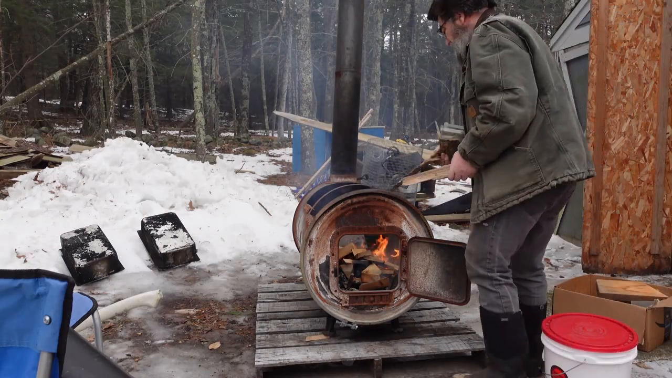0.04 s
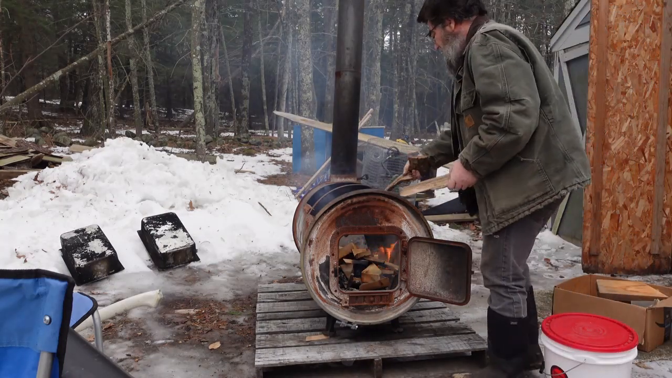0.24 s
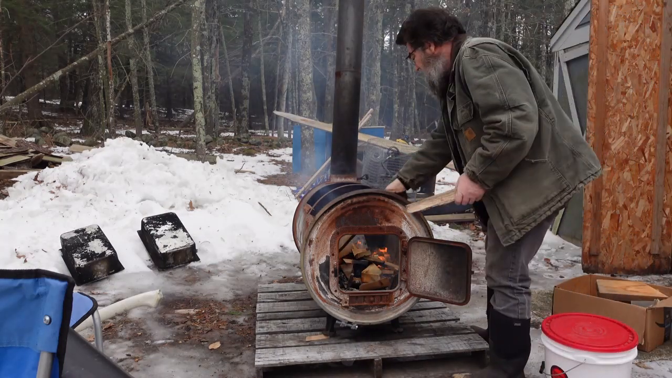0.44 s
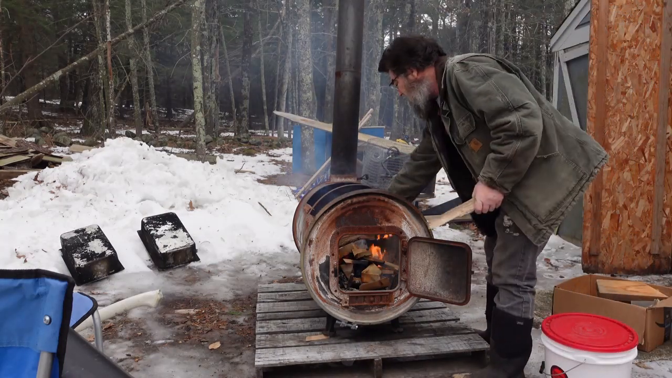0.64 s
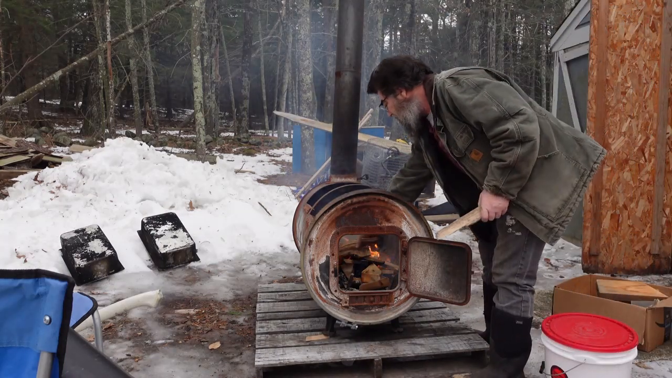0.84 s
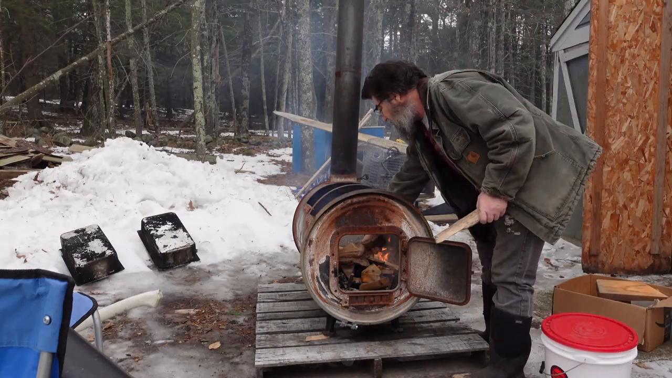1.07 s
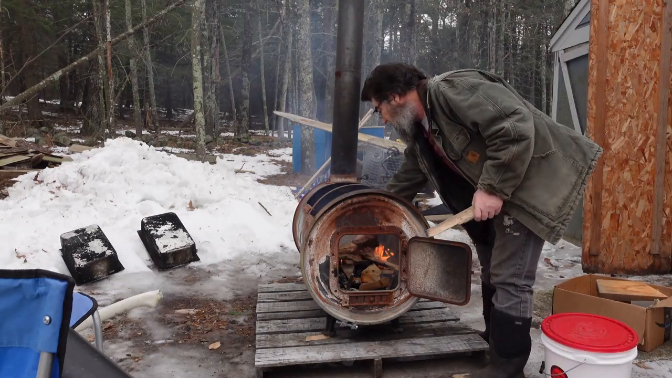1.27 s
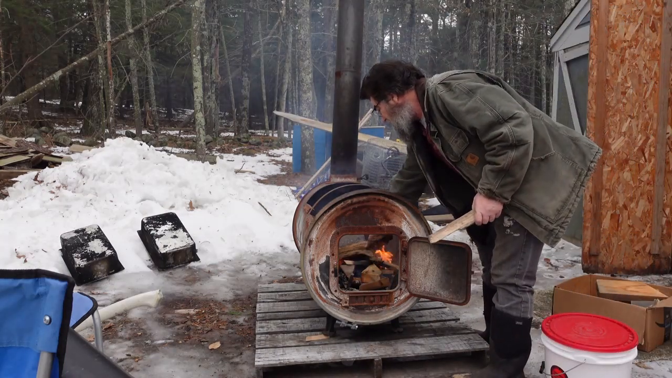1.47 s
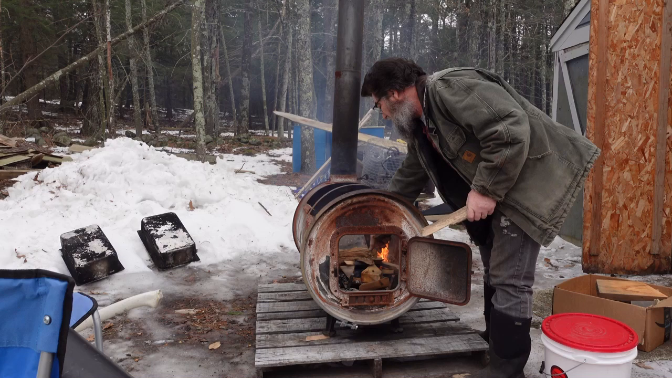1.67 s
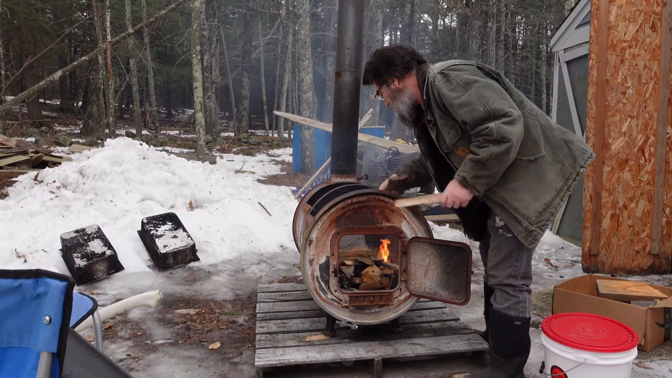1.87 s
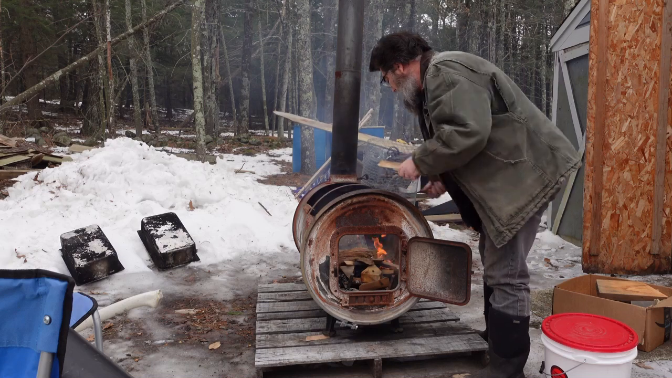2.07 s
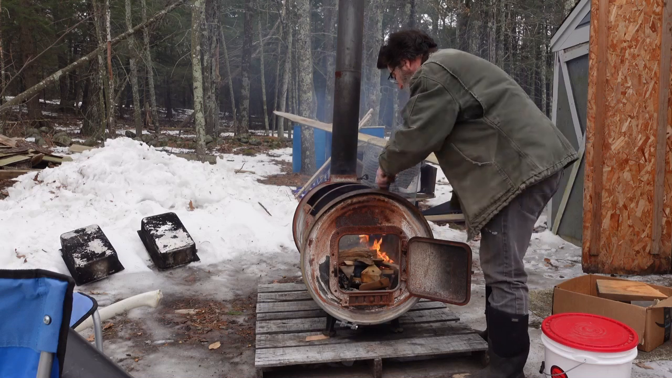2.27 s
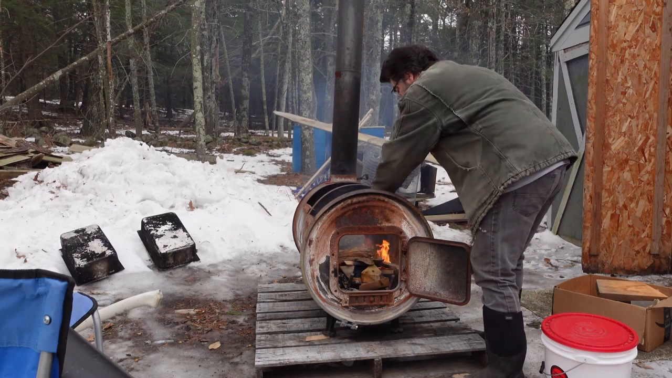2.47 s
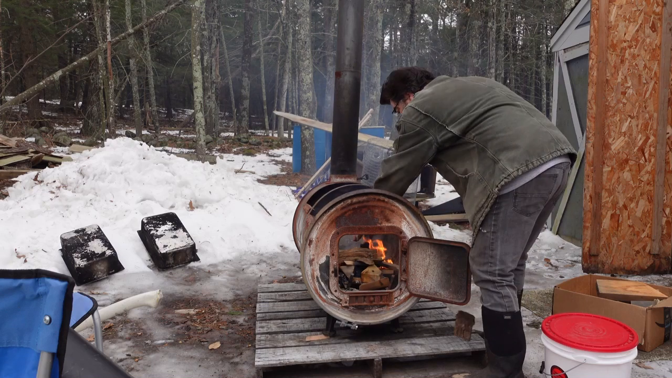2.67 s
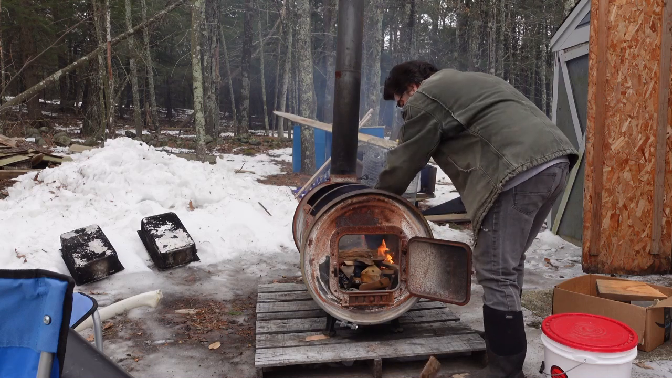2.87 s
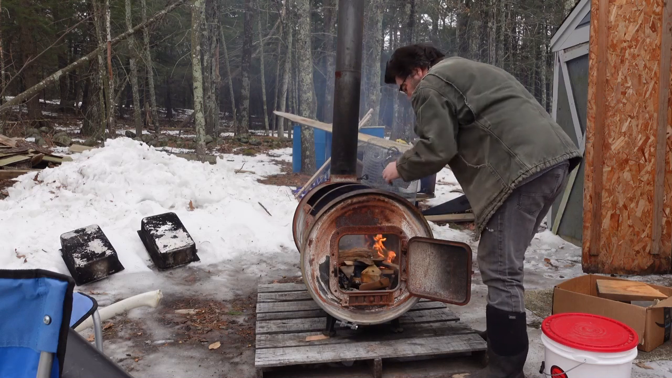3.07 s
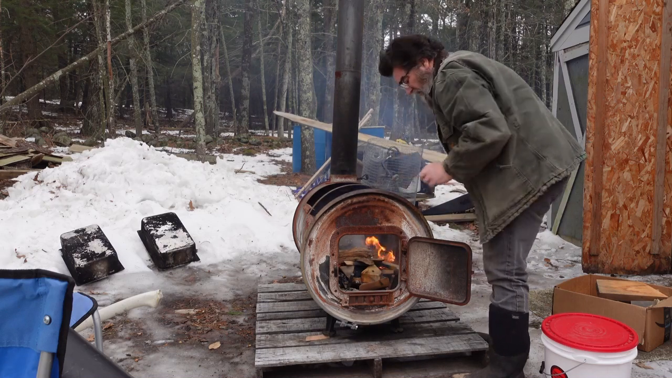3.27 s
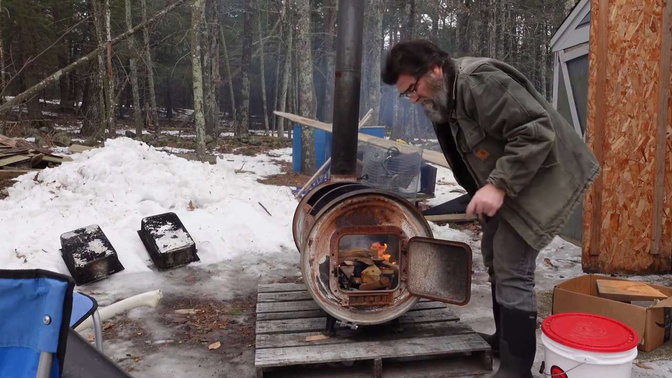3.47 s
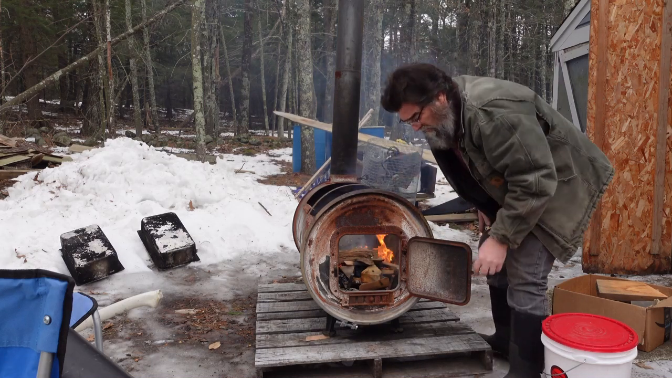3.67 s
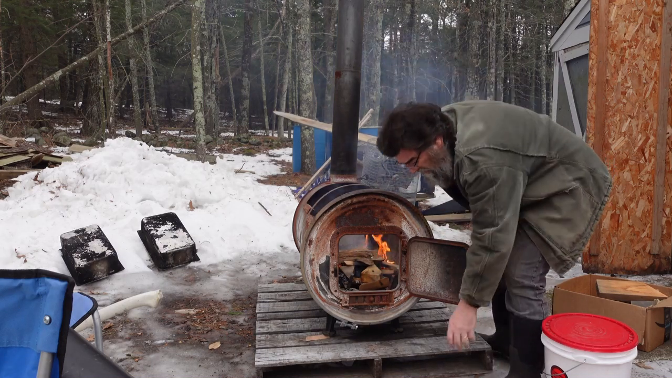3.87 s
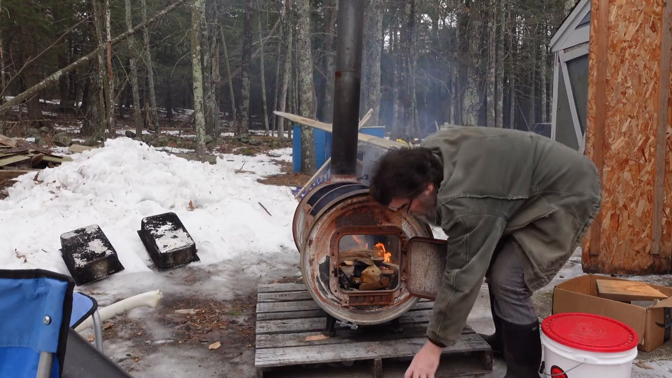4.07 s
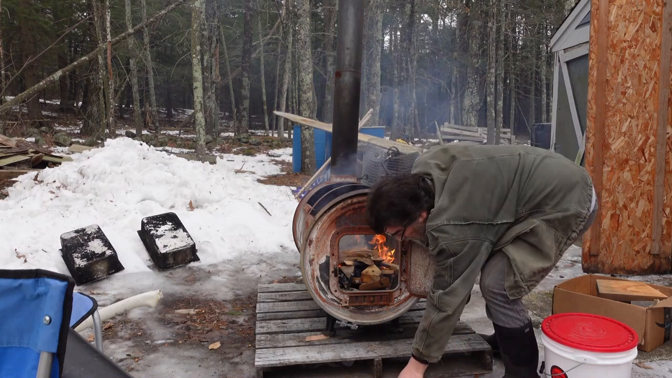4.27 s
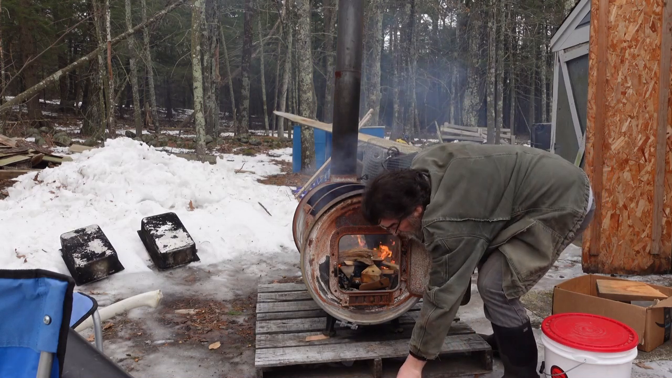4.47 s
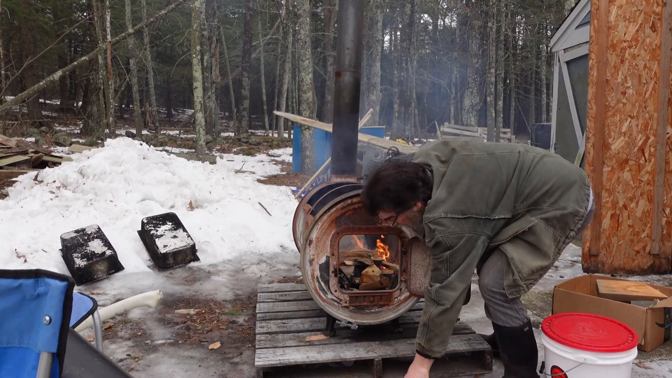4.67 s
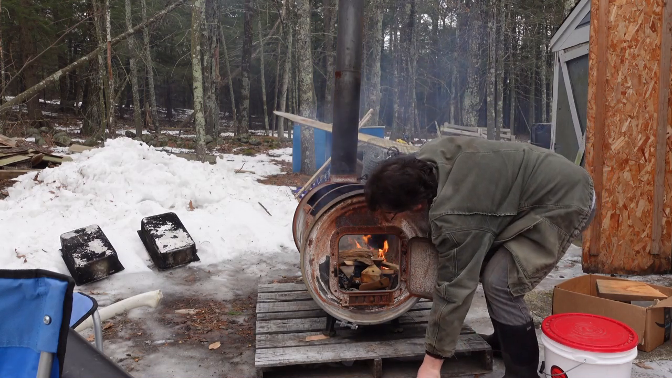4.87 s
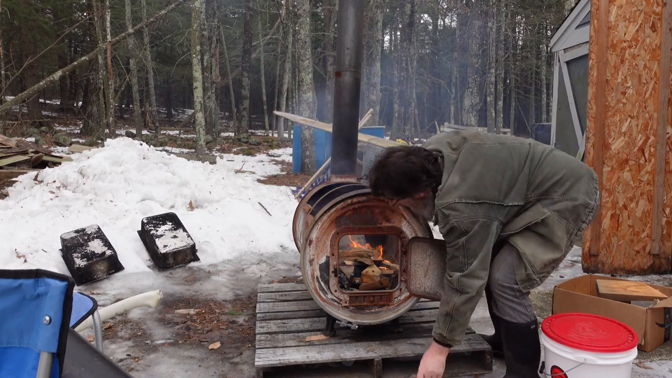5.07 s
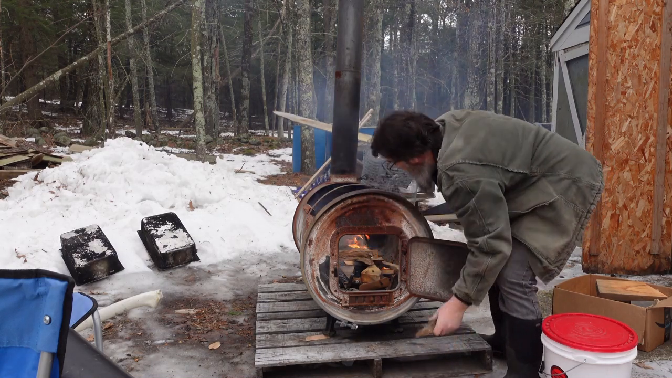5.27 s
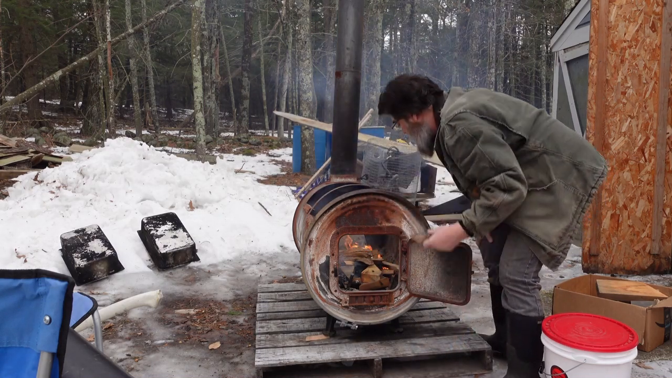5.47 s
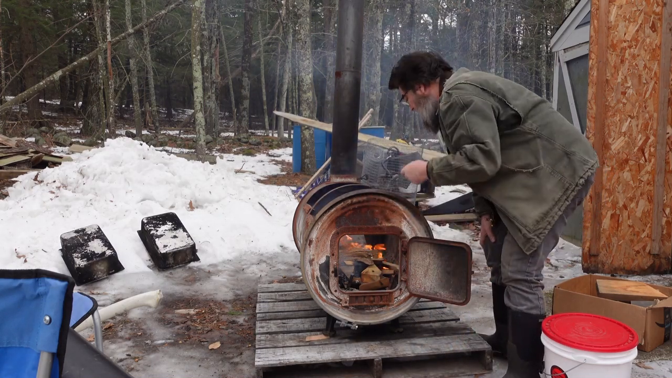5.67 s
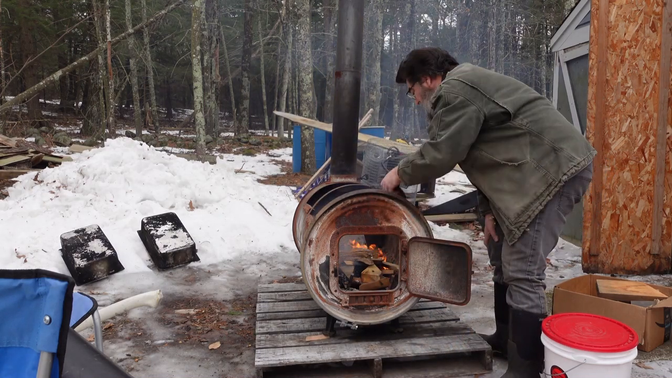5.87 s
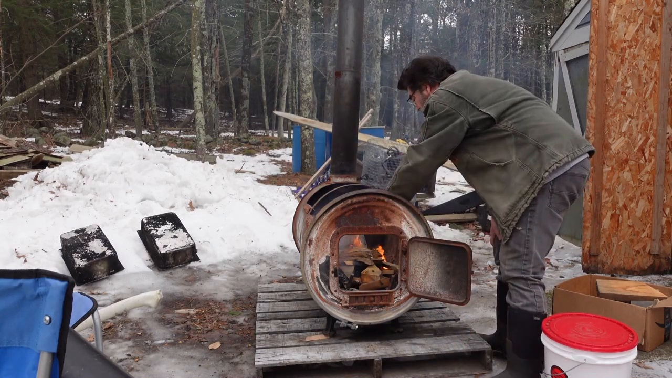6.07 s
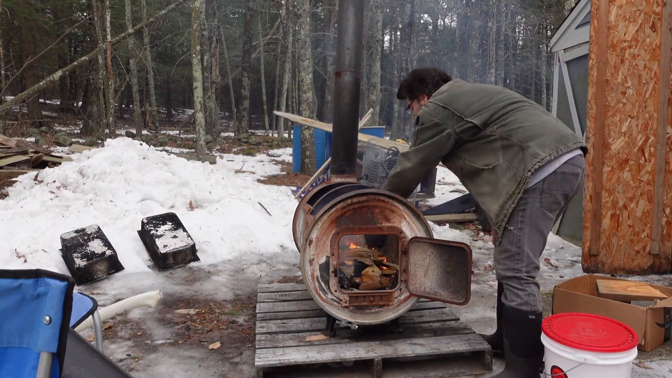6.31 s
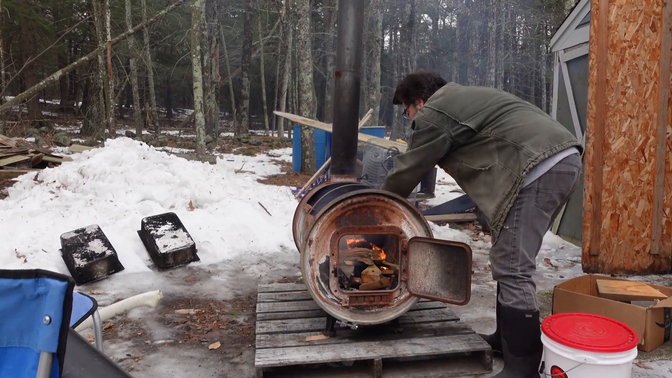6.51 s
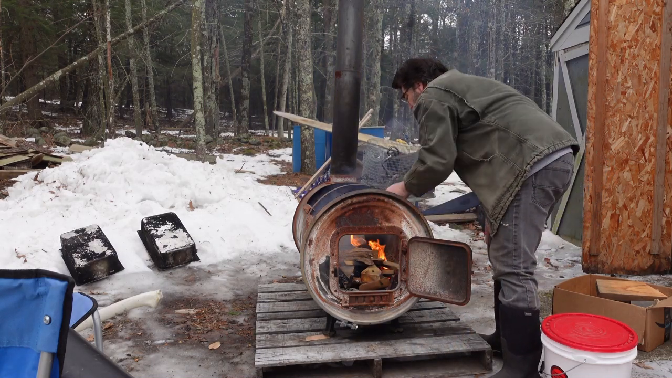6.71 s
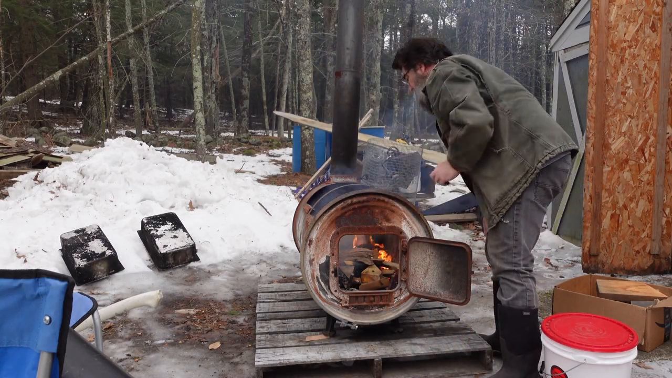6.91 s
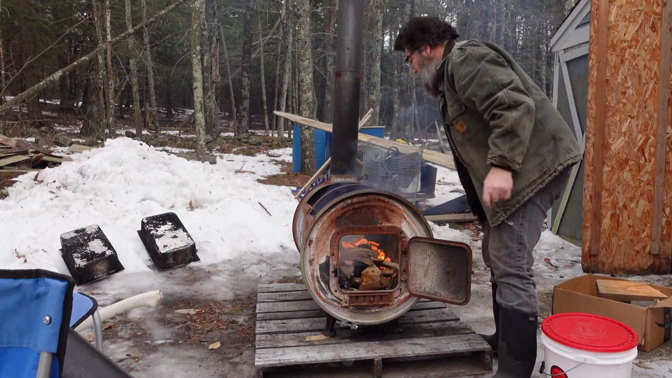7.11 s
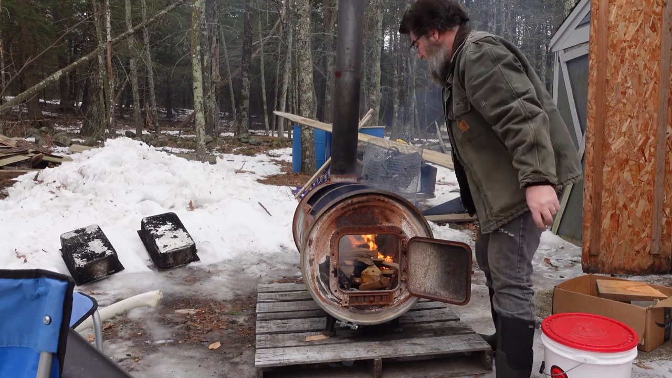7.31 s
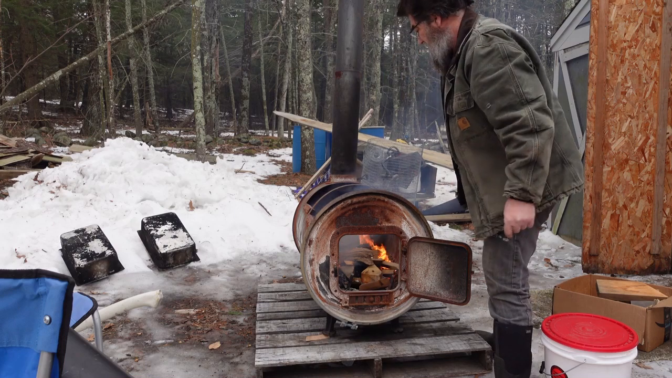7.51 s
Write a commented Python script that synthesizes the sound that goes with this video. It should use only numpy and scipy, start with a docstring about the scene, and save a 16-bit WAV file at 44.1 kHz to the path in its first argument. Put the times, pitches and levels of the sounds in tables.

```python
"""Loading a steel drum stove

Split firewood goes into a stove in a snowy wood, a few metres away. Sticks knock, scrape and clatter;
each blow on the steel booms in the drum and rings the rim of the opening. A jacket rustles as cloth
rubs on cloth, and a hand rakes crunchy scraps off the icy ground. Underneath are the soft wash of
outdoor air, tiny ticks from the fire and three faint, far-off tones."""
import sys
import numpy as np
from scipy import signal
from scipy.fft import rfft, irfft
from scipy.io import wavfile
from scipy.ndimage import uniform_filter1d, map_coordinates

SR = 44100
rng = np.random.default_rng(int(sys.argv[2]) if len(sys.argv) > 2 else 0)


def digitize_waveform(pressure):
    """Quantize a signal to 16-bit integers and store it at the path in sys.argv[1].

    Rows of a 2-D input are taken as channels; values are limited to [-1, 1].
    """
    field = np.atleast_2d(pressure).T
    bounded = np.clip(field, -1, 1)
    quanta = np.round(bounded * 32767).astype(np.int16)
    wavfile.write(sys.argv[1], SR, quanta)


N = 332822
T = np.arange(SR) / SR  # one second of time, counted from the start of a sound

# tone colour of the outdoor air: f/Hz, level/dB
AIR_COLOUR = [(15, -81), (25, -24), (74, -20), (127, -7.5), (223, -11.5), (677, -1), (1520, 0.5),
              (2160, 0.5), (2610, -4.5), (2910, -6), (5140, -10), (7510, -13), (14800, -19.5), (16000, -28)]
# how alike the air is in both ears: f/Hz, likeness (1 = the same)
EAR_LIKENESS = [(60, 1), (240, 0.55), (950, 0.37), (3770, 0.071), (15000, 0.71)]
# tone colour of a dry crack of wood: f/Hz, level/dB
CRACK_COLOUR = [(100, -66), (600, 5.5), (2000, 12.5), (5000, 9), (8000, 5.5), (12000, -10.5), (16000, -12)]
# tone colour of rubbing canvas: f/Hz, level/dB
CLOTH_COLOUR = [(60, -55), (300, -21), (700, -3), (1300, 3.5), (2800, -1.5), (6000, -5), (10000, -14.5),
                (16000, -26.5)]
# arm movements that rustle the jacket: start/s, length/s, level/dB
ARM_MOVES = [(0.2, 7.3, -59.5), (1.9, 0.77, -59.5), (3.09, 2.1, -52), (4.32, 0.7, -53),
             (5.194, 0.52, -59.5), (6, 0.26, -57.5), (6.51, 0.67, -53), (7.175, 0.3, -62.5),
             (7.455, .12, -56.5)]
# knocks of wood (a ring time is how long a sound takes to fade by 60 dB):
# t/s, ring peak/dB, stick pitch/Hz, ring time/s, crack peak/dB, crack treble limit/Hz
WOOD_KNOCKS = [(0.11, -42, 5500, 0.027, -57, 9000), (.138, -41, 1510, 0.18, -30, 9000),
               (.188, -44, 1450, .03, -33, 14000), (0.26, -34, 1900, 0.12, -44, 4000),
               (.427, -31, 1950, .03, -36.5, 6000), (.492, -18.5, 2200, 0.082, -17.5, 5500),
               (.494, -29, 1170, 0.053, -31, 6000), (0.695, -51, 3400, .02, -35.5, 14000),
               (.755, -22.5, 1186, 0.083, -42, 5000), (0.919, -28.5, 6680, 0.052, -26.5, 9000),
               (1.328, -39, 2230, 0.025, -16, 4200), (1.343, -23.5, 600, .052, -28, 6000),
               (1.372, -28, 7440, 0.034, -28, 15000), (1.623, -37.5, 1600, 0.068, -32, 5000),
               (1.671, -35, 744, 0.033, -41, 8000), (1.771, -37, 5470, 0.027, -45, 12000),
               (2.5873, -9, 1944, 0.088, -16.5, 6500), (2.5877, -1.5, 4980, 0.0072, -22.5, 17000),
               (2.69, -43, 3000, .02, -21.5, 12000), (2.858, -14.5, 1497, 0.092, -12.5, 17000),
               (2.979, -11, 875, 0.048, -28, 4500), (3.033, -21.5, 1114, 0.1, -36, 5000),
               (3.1263, -6, 1740, 0.022, -25.5, 8000), (3.1459, -11.5, 835, 0.019, -26.5, 9000),
               (3.1519, -9, 1070, .035, -31, 6000), (3.1578, -6, 1660, .014, -21, 5000),
               (3.168, -13, 1110, 0.024, -30, 5000), (3.264, -20, 1650, 0.091, -61, 8000),
               (3.468, -27.5, 2490, 0.072, -38, 6000), (4.228, -45, 6120, 0.17, -44, 14000),
               (4.326, -32, 1034, 0.045, -40, 4000), (4.622, -28, 3200, 0.013, -20, 12000),
               (4.678, -38, 9000, 0.033, -51, 15000), (4.701, -40, 7060, 0.074, -56, 15000),
               (4.93, -44, 1680, .018, -40, 8000), (5.032, -49, 610, 0.043, -41.5, 8000),
               (5.437, -44, 2600, .02, -43, 10000), (5.504, -35, 1960, 0.053, -33, 14000),
               (5.943, -40, 5380, 0.056, -48, 16000), (5.999, -38, 2720, 0.021, -37, 9000),
               (6.508, -36, 1240, 0.034, -26, 14000), (6.54, -21.5, 840, 0.049, -27.5, 2200),
               (6.982, -32, 3370, 0.021, -35, 5000), (7.153, -46, 3300, .031, -41.5, 10000),
               (7.23, -32, 800, 0.018, -32, 2500)]
# the notes a split stick rings at: multiple of its pitch, level/dB, share of its ring time
STICK_NOTES = [(0.456, -4.5, 0.87), (0.68, 1, 0.72), (0.999, 8.5, 0.69), (1.172, 4.5, 0.29),
               (1.661, -8.5, 0.54), (2.45, -14, 0.81), (3.1, -20, 0.65)]
# strokes of sliding wood (a narrow width squeaks):
# start/s, length/s, level/dB, pitch/Hz, width/octaves, steel ring compared with the grit/dB
SLIDES = [(0.134, 0.15, -46, 2530, 0.78, -23), (0.257, 0.058, -38, 2160, 0.22, -24.5),
          (0.479, 0.045, -26.5, 1325, 0.028, -36), (0.743, 0.11, -36.5, 5250, 1.2, -2),
          (0.827, 0.22, -38.5, 6440, 1.4, -21), (1.016, 0.35, -38.5, 5500, 0.92, -17),
          (1.27, 0.25, -36.5, 6850, 1.6, -16), (1.415, 0.32, -45.5, 5160, 2.4, -16),
          (1.629, 0.023, -39.5, 2400, 0.19, -23), (1.643, .1, -40, 3660, 1.3, -21),
          (2.801, 0.036, -34.5, 6600, 0.12, -8), (3.223, 0.1, -35, 2520, 0.43, -5.5),
          (3.475, 0.12, -32.5, 2460, 0.29, -25), (3.604, 0.087, -40, 1680, 0.55, -30),
          (3.613, 0.3, -48, 4150, 0.92, -28), (4.365, 0.24, -51, 3280, 0.0072, -33),
          (6.067, 0.075, -52, 3000, 0.45, -25), (6.528, 0.036, -35, 1500, 1.1, -2.5),
          (6.56, 0.087, -51.5, 3200, .012, -22), (6.665, .28, -51, 2480, 0.28, -27),
          (6.748, .075, -46, 1960, .3, -20), (6.923, 0.058, -51, 2310, 0.3, -26),
          (7.205, 0.043, -50, 2430, 0.45, -28), (7.323, 0.05, -54.5, 1990, 0.33, -7)]
# tone colour of rough wood slipping: f/Hz, level/dB
GRIT_COLOUR = [(60, -38), (300, 7), (900, 8), (3000, -1), (7500, -5.5), (11000, -8.5), (16000, -22)]
# pitches that stand out in a rubbed stick: f/Hz, width/Hz, level over the plain grit/dB
RASP_PEAKS = [(1140, 130, -8.5), (1580, 180, -10), (2214, 100, 4.5), (2766, 110, 6.5), (3230, 135, 9),
              (3920, 210, 7), (4750, 210, 6.5), (5630, 190, 9.5), (6320, 145, 5.5), (7030, 150, 7),
              (7460, 160, 4.5), (8720, 82, 5.5)]
# blows on the steel: t/s, shell/dB, boom/dB, rim/dB, hardness/Hz (higher is brighter)
STEEL_BLOWS = [(0.426, -42, -48, -60, 1920), (.493, -45.5, -48.5, -35.5, 2800),
               (.535, -60, -52, -48.5, 5500), (.639, -55, -53.5, -53.5, 3150),
               (.757, -37, -33.5, -45, 1220), (.80, -42.5, -42.5, -44, 1460),
               (.855, -49.5, -44.5, -58, 1410), (0.946, -74, -53.5, -75, 1500),
               (1.329, -32, -33, -61, 1490), (1.341, -35.5, -36, -58, 1070), (1.359, -53, -46, -70, 50),
               (1.421, -61, -67, -43.5, 1800), (1.667, -51, -64, -70, 1190), (2.5876, -21, -49, -30, 5600),
               (2.61, -22.5, -32.5, -34, 3820), (2.763, -40, -59, -30.5, 5900),
               (2.803, -42, -41.5, -42, 1450), (2.859, -50, -54, -31.5, 8000), (2.876, -44, -57, -23, 9700),
               (2.978, -35, -50, -29.5, 3540), (3.091, -60, -45.5, -40, 4460),
               (3.154, -46, -45.5, -36, 1990), (3.205, -40.5, -51, -40.5, 5500),
               (3.26, -41, -66, -42, 3570), (3.313, -44.5, -75, -36, 3900), (6.508, -48, -52, -76, 1500),
               (6.54, -41, -64, -58, 1180), (6.55, -50, -53, -68, 260)]
# the strongest notes of the drum's shell: f/Hz, level/dB, ring time/s
SHELL_NOTES = [(802, -4, 0.33), (870, -19, 0.23), (933, 1, 0.17), (930, -3, 0.14), (1100, 3, 0.24),
               (1450, -1, 0.15), (1513, 13.5, 0.089), (1848, -10, 0.067), (2010, 12, 0.083), (2230, 2, .28),
               (2306, -1.5, 0.58), (2480, 0, 0.51), (2840, -2, 0.26), (3920, -1, 0.14)]
# the shell's countless weaker notes, blurred into noise: f/Hz, level/dB, ring time/s
SHELL_NOISE = [(40, -54, 0.4), (80, -19, 0.4), (140, -9, 0.35), (300, -5.5, 0.84), (530, -5, 0.79),
               (890, 9, 0.3), (2200, 3.5, 0.47), (3350, 5, 0.11), (6300, -12.5, 0.81), (10300, -19.5, 0.9),
               (16400, -33, 0.22)]
# the low notes of the hollow drum: f/Hz, level/dB, ring time/s
BOOM_NOTES = [(85.5, -24, 0.52), (135, -17.5, 0.56), (169.5, -13.5, 0.42), (233.8, -7.5, 0.34),
              (261, -4.5, 0.21), (356.3, 1, 0.18), (400, -1.5, 0.24), (442, 1.5, 0.22), (462.5, 3, 0.26),
              (492, 3, 0.55), (556.5, 6.5, 0.29), (658, -0.5, 0.37)]
# the notes of the steel rim: f/Hz, level/dB, ring time/s
RIM_NOTES = [(361.4, -32, 0.33), (487.3, -15.5, 0.18), (547.3, -16, 0.41), (1190, -12.5, 0.44),
             (1248, -7, 0.73), (1300, -15.5, 0.22), (1502, -12, 0.23), (1985, -5.5, 0.15), (2130, -6, 0.18),
             (2560, 1.5, 0.11), (2590, -1.5, 0.084), (3030, -10, 0.13), (3314, -1, 0.099), (3860, -9, 0.11),
             (4200, 1, 0.047), (4670, -15, 0.16), (4970, -9, 0.1), (5590, -7, 0.12), (5630, -18, 0.055),
             (5700, -20, 0.14), (6940, -31, .12), (7450, -36, .13)]
# thin tones far off: start/s, length/s, level/dB, starting pitch/Hz
FAR_TONES = [(1.778, .33, -49.5, 1425), (3.87, 0.28, -57, 1375), (4.664, 0.39, -64, 1059)]
# loudness of a hand raking the icy ground: t/s, level/dB
RAKE_LEVELS = [(4.47, -67), (4.515, -46.5), (4.55, -37.5), (4.59, -39.5), (4.605, -46), (4.625, -35),
               (4.648, -40.5), (4.67, -55), (4.76, -66)]
# tone colour of breaking ice crumbs: f/Hz, level/dB
ICE_COLOUR = [(60, -55), (450, -31), (900, -0.5), (2100, 0.5), (3600, 0.5), (5000, -3), (7000, -0.5),
              (8800, -4), (10500, -12.5), (13500, -14), (16000, -29)]
# tone colour of the nearby echoes (short waves scatter most): f/Hz, level/dB
ECHO_COLOUR = [(100, -13), (500, -8.5), (1500, -2), (4000, 3.5), (12000, 3.5)]
# balance between the ears: f/Hz, left minus right/dB
BALANCE = [(60, 0), (1000, -1.6), (2200, -0.7), (4500, -2), (8000, -1.5), (13000, 0.5)]


def amp(db):
    """Turns decibels into a number to multiply by."""
    return 10 ** (np.asarray(db) / 20)


def unit_level(x):
    """Scales a sound so its average strength (rms) is 1."""
    return x / np.sqrt(np.mean(x ** 2) + 1e-20)


def look_up(table, hz):
    """Reads between a table's rows, with octaves evenly spaced."""
    f, value = np.transpose(table)
    return np.interp(np.log(hz + 1), np.log(f + 1), value)


def coloured(x, table):
    """Gives a sound the tone colour in a table."""
    return irfft(rfft(x) * amp(look_up(table, np.fft.rfftfreq(x.shape[-1], 1 / SR))), x.shape[-1])


def add(mix, start, sound):
    """Adds a sound to the mix, start seconds in."""
    part = mix[round(start * SR):][:len(sound)]
    part += sound[:len(part)]


def wobble(shape, samples):
    """A random wiggle; smoothing over more samples makes it slower."""
    return unit_level(uniform_filter1d(rng.standard_normal(shape), size=samples))


def grains(count, per_s, spread_db):
    """Tiny clicks of uneven size at random moments."""
    size = amp(spread_db * np.minimum(rng.exponential(1, count), 4)) * rng.standard_normal(count)
    return unit_level(size * (rng.random(count) < per_s / SR))


def swell(start, length, skew):
    """One smooth rise and fall of height 1; a skew under 1 brings the top earlier."""
    progress = np.clip((np.arange(N) / SR - start) / length, 0, 1)
    return np.sin(np.pi * progress ** skew)


def softened(x, corner_hz):
    """Dulls the treble, as a soft blow does, then sets the first 50 ms to strength 1."""
    pole = np.exp(-2 * np.pi * corner_hz / SR)
    x = signal.lfilter([1 - pole], [1, -2 * pole, pole * pole], x)
    return x / np.sqrt(np.mean(x[:SR // 20] ** 2))


def octaves(x):
    """Splits a sound into overlapping octave bands; returns their centres and the bands."""
    centres = SR / 2 ** np.arange(10, 1, -1.) * np.sqrt(2)
    place = np.log2(np.fft.rfftfreq(len(x), 1 / SR) + 1)
    shares = np.array([np.interp(place, np.log2(centres), row) for row in np.eye(len(centres))])
    return centres[:, None], irfft(rfft(x) * shares, len(x))


def air(level_db=-59, drift_db=-2.3):
    """The wash of the woods and the draught of the fire: noise that drifts gently in level."""
    left, other = rfft(rng.standard_normal((2, N)))
    likeness = np.clip(look_up(EAR_LIKENESS, np.fft.rfftfreq(N, 1 / SR)), -1, 1)
    right = likeness * left + np.sqrt(1 - likeness ** 2) * other
    wash = coloured(irfft(np.array([left, right]), N), AIR_COLOUR)
    return amp(level_db + drift_db * wobble(N, samples=6000)) * unit_level(wash)


def embers(level_db=-70, fade_s=0.071):
    """Burning wood gives off small, scattered ticks."""
    tick = coloured(rng.standard_normal(SR), CRACK_COLOUR) * amp(-60 * T / fade_s)
    ticks = signal.oaconvolve(grains(N, per_s=15, spread_db=-0.5), tick)[:N]
    return amp(level_db) * unit_level(ticks)


def jacket(rest_db=-67.5):
    """Canvas rubs on canvas: one swell for each arm movement, and a slight stir at rest."""
    moves = sum((amp(db) * swell(start, length, skew=0.44)) ** 2 for start, length, db in ARM_MOVES)
    speed = np.sqrt(amp(rest_db) ** 2 + moves)
    return speed * unit_level(coloured(grains(N, per_s=9000, spread_db=-0.2), CLOTH_COLOUR))


def knocks(crack_s=0.025, tail_s=0.09, tail_db=-19, low_cut_hz=260):
    """A stick rings briefly under the dry crack of its surface; it is too small to give off bass."""
    out, t = np.zeros(N), T[:SR // 5]
    ratio, db, share = np.transpose(STICK_NOTES)[:, :, None]
    sign = (-1) ** np.arange(len(STICK_NOTES))[:, None]
    snap = amp(-60 * t / crack_s) + amp(tail_db - 60 * t / tail_s)
    for start, peak_db, hz, ring_s, crack_db, bright_hz in WOOD_KNOCKS:
        fade = amp(db - 60 * t / (ring_s * share))
        ring = (sign * fade * np.sin(2 * np.pi * hz * ratio * t)).sum(0)
        treble_cut = signal.butter(2, min(bright_hz, .45 * SR), fs=SR)
        crack = signal.lfilter(*treble_cut, coloured(rng.standard_normal(len(t)), CRACK_COLOUR) * snap)
        add(out, start, amp(peak_db) * ring / abs(ring).max() + amp(crack_db) * crack / abs(crack).max())
    return signal.sosfilt(signal.butter(2, low_cut_hz, "highpass", fs=SR, output="sos"), out)


def rasp(count, per_s, spread_db, shift=0.034, wander_db=4.5, wander_per_s=30, slide=.02):
    """Tiny slips ring the stick's own pitches, which come, go and slide as the touching point moves."""
    grit = coloured(grains(count, per_s, spread_db), GRIT_COLOUR)
    out = grit.copy()
    for hz, width, db in RASP_PEAKS:
        detune, *wander = rng.standard_normal(64)
        steps = amp(db + wander_db * np.array(wander))
        gain = np.interp(T[:count] * wander_per_s, np.arange(len(steps)), steps)
        peak = signal.iirpeak(hz * (1 + shift * detune), hz / width, fs=SR)
        out += gain * signal.lfilter(*peak, grit)
    speed = 1 + slide * unit_level(uniform_filter1d(wobble(count, samples=1500), size=1500))
    return map_coordinates(out, [np.cumsum(speed)], order=3, mode="mirror")  # uneven speed bends pitch


def steel_notes(table, ring_scale, spread_db=4.5, rise_s=0.002, detune=0.0036):
    """Steel rings at its own notes (one row each), a little differently wherever it is touched."""
    hz, db, ring_s = np.transpose(table)[:, :, None]
    strength = amp(db + spread_db * rng.standard_normal(hz.shape))
    phase = 2 * np.pi * rng.random(hz.shape)
    hz = hz * (1 + detune * rng.uniform(-1.23, 1, hz.shape))
    fade = amp(-60 * T / (ring_s * ring_scale))
    return strength * fade * np.cos(2 * np.pi * hz * T + phase) * (1 - np.exp(-T / rise_s))


def scrapes(ends_db=-19, judder_db=1.0, hardest_at=0.27):
    """Rough wood slides, catching and slipping; the slips rasp in the stick and ring the steel."""
    out, count = np.zeros(N), SR // 2
    f = np.fft.rfftfreq(count, 1 / SR) + 1
    for start, length, db, hz, width, steel_db in SLIDES:
        judder = wobble(count, samples=300)
        # 0 where the wood presses hardest, 1 at both ends of the stroke
        slack = np.interp(T[:count] / length, [0, hardest_at, 1], [1, 0, 1])
        force = amp(ends_db * slack ** 1.14 + judder_db * judder) * np.clip(8 * (1 - slack), 0, 1)
        band = 1 / np.sqrt(1 + (np.log2(f / hz) / width) ** 2)
        grit = unit_level(irfft(rfft(rasp(count, per_s=4000, spread_db=-0.5)) * band, count))
        damped = steel_notes(RIM_NOTES + BOOM_NOTES[4:], ring_scale=0.16)  # the stick presses on it
        ring = softened(damped.sum(0), corner_hz=2640)
        rubbing = rng.standard_normal(count) * force
        steel = signal.fftconvolve(rubbing, ring / np.linalg.norm(ring))[:count]
        add(out, start, amp(db) * (grit * force + amp(steel_db) * steel))
    return out


def build_up(hz, cycles):
    """Low bending waves travel slowly round the drum, so the bass arrives after the treble."""
    return 1 - np.exp(-(T * hz / cycles) ** 2)


def rim_clang(ring_scale, buzz_db=-6, buzz_s=0.091, rise_s=0.0021):
    """The rim rings while the stick buzzes briefly against it."""
    buzz = rasp(SR, per_s=3300, spread_db=0.0) * amp(-60 * T / buzz_s)
    ring = steel_notes(RIM_NOTES, ring_scale, spread_db=2.5).sum(0)
    return (unit_level(ring) + amp(buzz_db) * unit_level(buzz)) * (1 - np.exp(-T / rise_s))


def stove(notes_db=-5.0, rebound_hz=5500, pressed_scale=0.73):
    """Each blow sets off the crash of the shell, the boom of the hollow drum and the clang of the rim."""
    out, noise_table = np.zeros(N), np.array(SHELL_NOISE)
    centres, _ = octaves(T)
    crash_s = look_up(noise_table[:, ::2], centres)
    crash_rise = build_up(centres, cycles=1.6)
    boom_rise = build_up(np.array(BOOM_NOTES)[:, :1], cycles=2.1)
    for start, shell_db, boom_db, rim_db, hard_hz in STEEL_BLOWS:
        # a hard blow bounces off; a soft one stays pressed on and shortens the ring
        ring_scale = max(pressed_scale, (hard_hz / rebound_hz) ** 0.32)
        _, bands = octaves(coloured(rng.standard_normal(SR), noise_table[:, :2]))
        crash = (bands * crash_rise * amp(-60 * T / (ring_scale * crash_s))).sum(0)
        notes = steel_notes(SHELL_NOTES, ring_scale).sum(0)
        shell = unit_level(crash) + amp(notes_db) * unit_level(notes)
        boom = (steel_notes(BOOM_NOTES, ring_scale) * boom_rise).sum(0)
        for db, part in (shell_db, shell), (boom_db, boom), (rim_db, rim_clang(ring_scale)):
            add(out, start, amp(db) * softened(part, hard_hz))
    return out


def far_tones(rise_hz_per_s=120, waver=0.0325, flutter_db=3.5, octave_below_db=-13):
    """Each faint, hoarse tone swells and rises slightly, with a weaker one an octave below."""
    out = np.zeros(N)
    jitter, flutter = wobble((2, N), samples=110)
    for start, length, db, pitch_hz in FAR_TONES:
        hz = pitch_hz + rise_hz_per_s * (np.arange(N) / SR - start)
        phase = 2 * np.pi * np.cumsum(hz * (1 + waver * jitter)) / SR
        level = amp(db + flutter_db * flutter) * swell(start, length, skew=0.59)
        out += level * (np.sin(phase) + amp(octave_below_db) * np.sin(phase / 2))
    return out


def ice_crunch(clump_db=1.5):
    """Icy crumbs break in dense clumps under the raking hand."""
    level_db = np.interp(np.arange(N) / SR, *np.transpose(RAKE_LEVELS), left=-np.inf, right=-np.inf)
    clumps = wobble(N, samples=250)
    crumbs = coloured(grains(N, per_s=8500, spread_db=-2.2), ICE_COLOUR)
    return amp(level_db + clump_db * clumps) * unit_level(crumbs)


def echoes(x, near_db=-13, near_s=0.12, trees_db=-25, trees_s=0.81):
    """Sound bounces quickly off a pallet and a shed wall, then faintly and dully off the trees."""
    near, trees = rng.standard_normal((2, SR)) * (rng.random((2, SR)) < .1)
    near = near * amp(-60 * T / near_s) * (T > .001)
    near = amp(near_db) * coloured(near / np.linalg.norm(near), ECHO_COLOUR)[:SR // 4]
    trees = softened(trees * amp(-60 * T / trees_s) * (1 - np.exp(-T / 0.0055)), corner_hz=4000)
    trees = amp(trees_db) * trees / np.linalg.norm(trees)
    return signal.oaconvolve(x, near)[:N] + signal.oaconvolve(x, trees)[:N]


def scene():
    """The sounds and their echoes sit a little right of centre, with the air all around."""
    direct = stove() + knocks() + scrapes() + jacket() + ice_crunch() + embers() + far_tones()
    ears = [coloured(direct + echoes(direct), [(hz, side * db / 2) for hz, db in BALANCE])
            for side in (1, -1)]
    return np.array(ears) + air()


def record(dry, low_cut_hz=54, ceiling=0.7, high_cut_hz=16000):
    """Cuts the deep bass, gently squashes the loudest peaks and removes the highest treble."""
    dry = signal.sosfilt(signal.butter(2, low_cut_hz, "highpass", fs=SR, output="sos"), dry)
    squashed = dry / (1 + (dry / ceiling) ** 4) ** .25
    treble_cut = signal.firwin(255, high_cut_hz, window=("kaiser", 9), fs=SR)
    return signal.oaconvolve(squashed, treble_cut[None], "same")


dry = scene()
out = record(dry)
digitize_waveform(out)
```